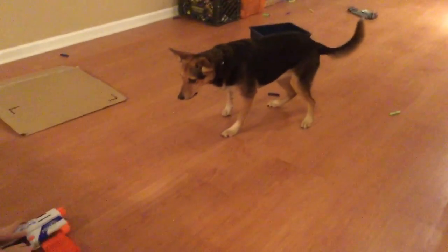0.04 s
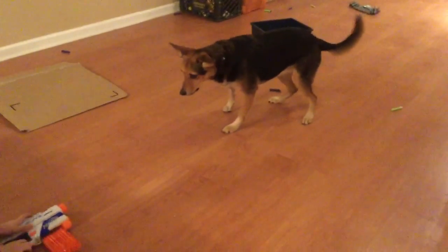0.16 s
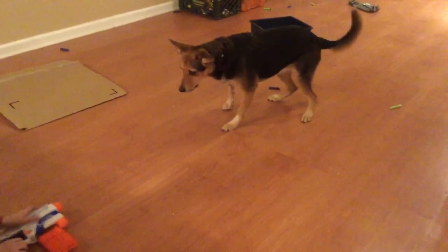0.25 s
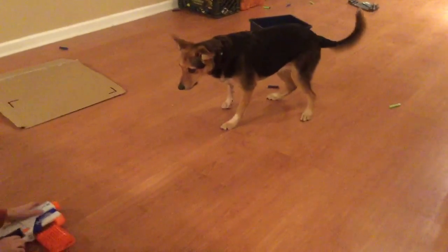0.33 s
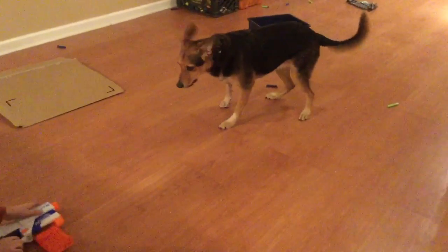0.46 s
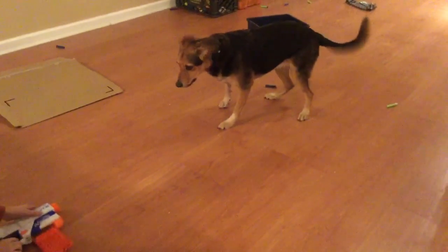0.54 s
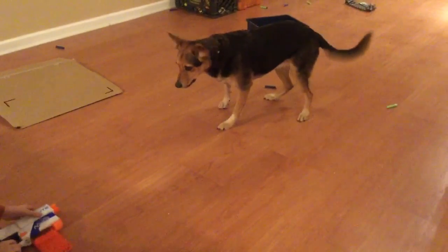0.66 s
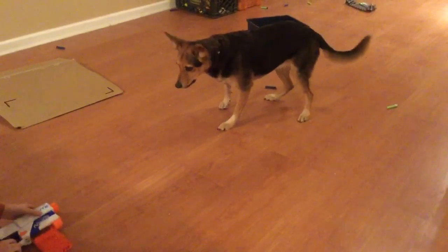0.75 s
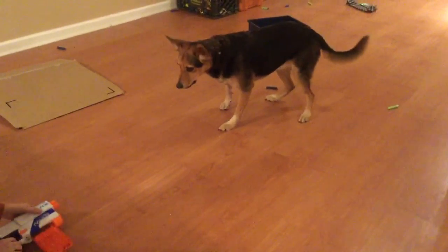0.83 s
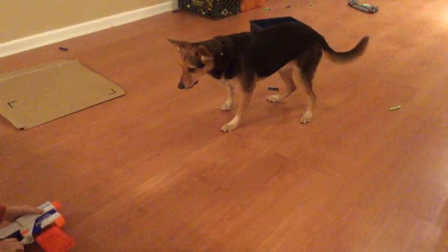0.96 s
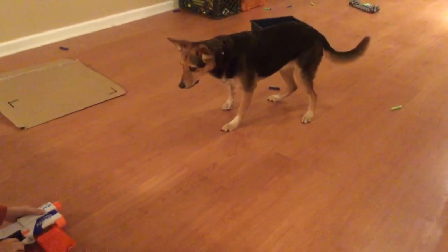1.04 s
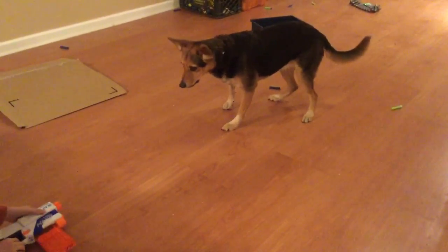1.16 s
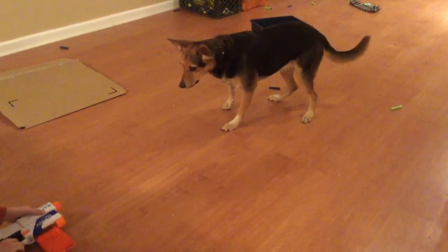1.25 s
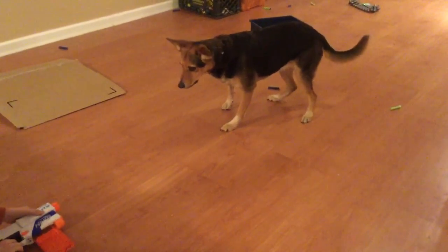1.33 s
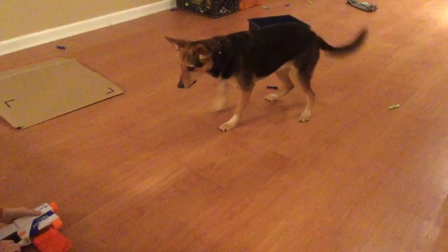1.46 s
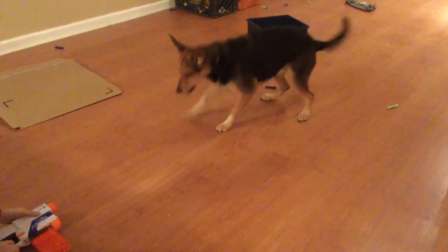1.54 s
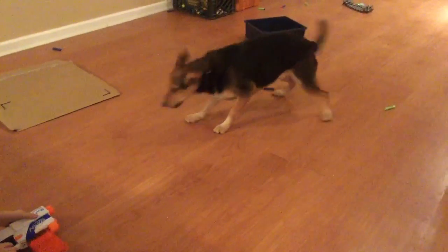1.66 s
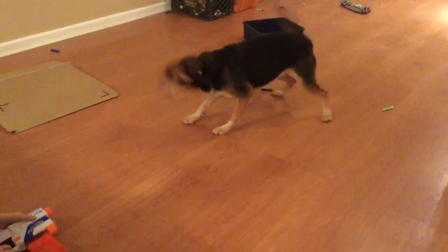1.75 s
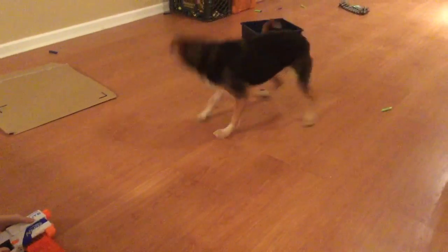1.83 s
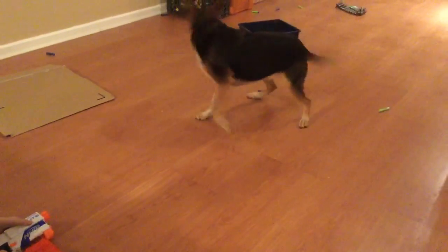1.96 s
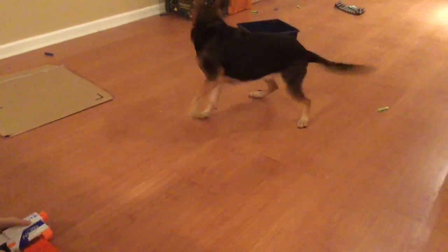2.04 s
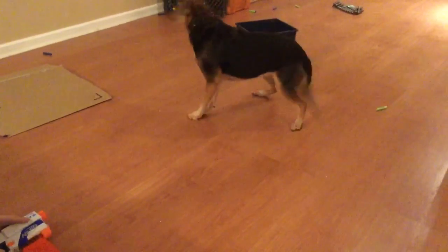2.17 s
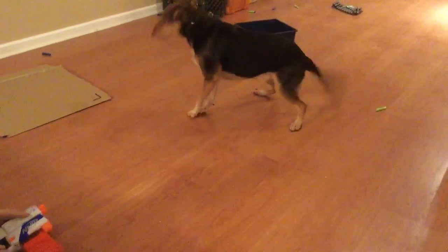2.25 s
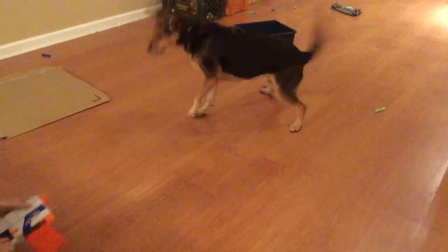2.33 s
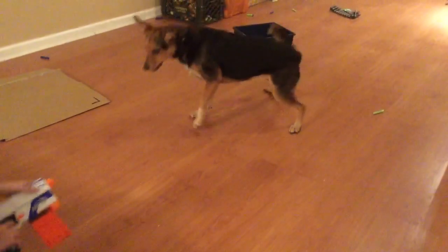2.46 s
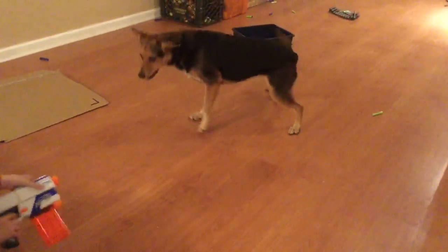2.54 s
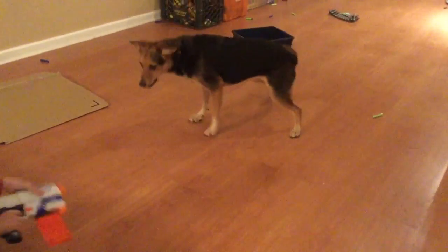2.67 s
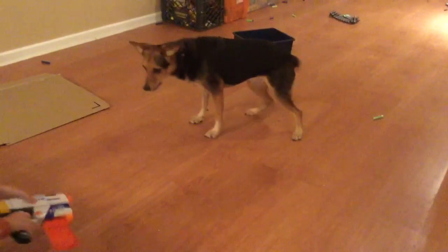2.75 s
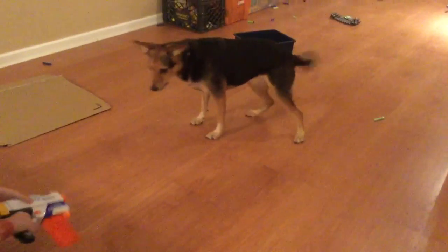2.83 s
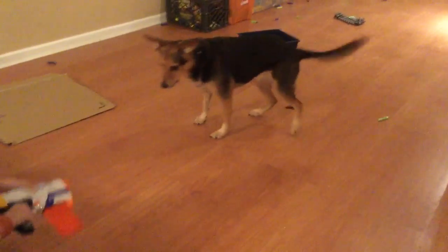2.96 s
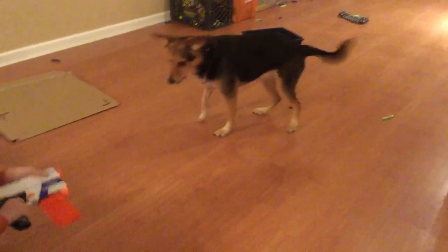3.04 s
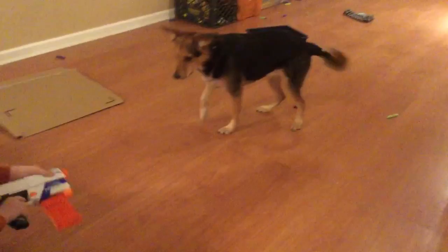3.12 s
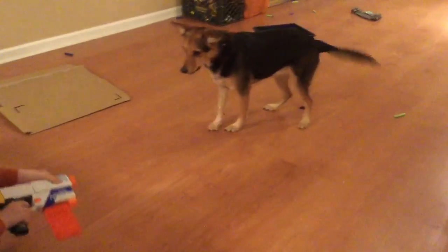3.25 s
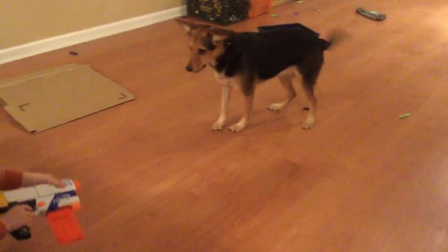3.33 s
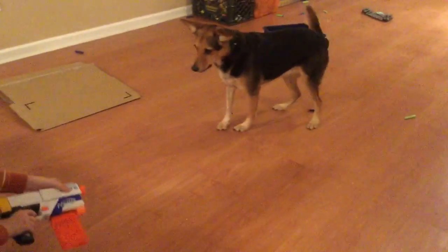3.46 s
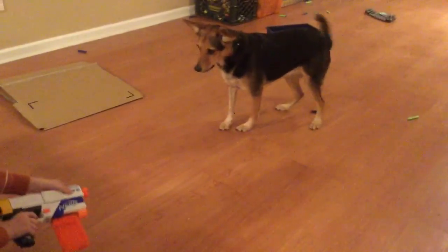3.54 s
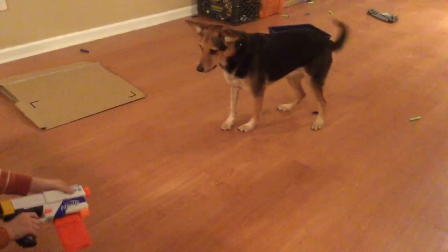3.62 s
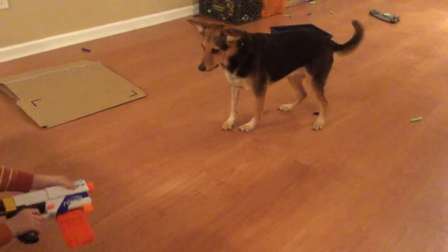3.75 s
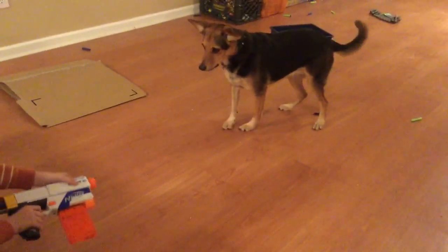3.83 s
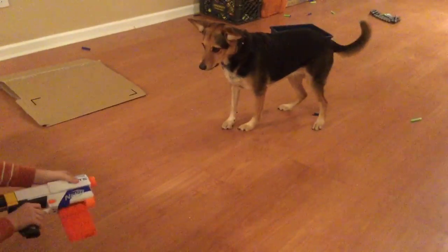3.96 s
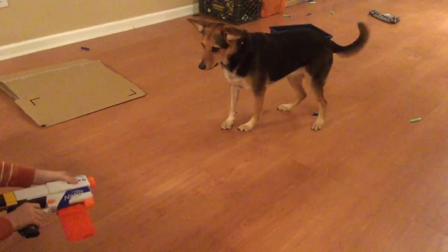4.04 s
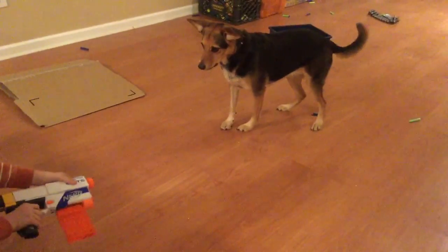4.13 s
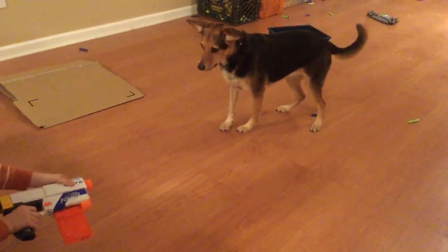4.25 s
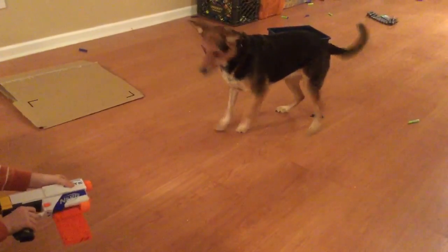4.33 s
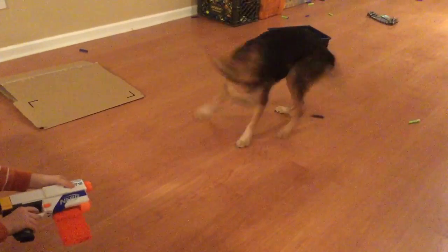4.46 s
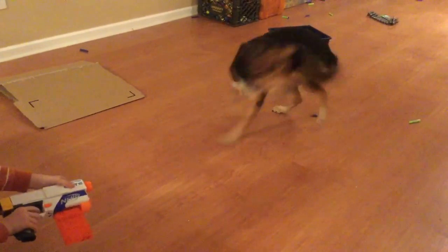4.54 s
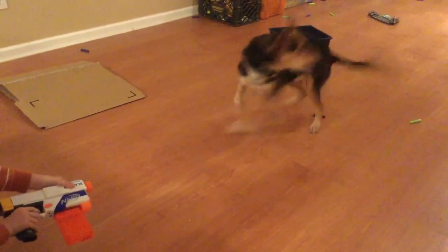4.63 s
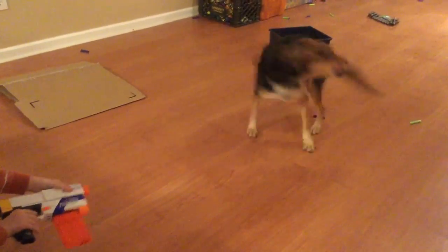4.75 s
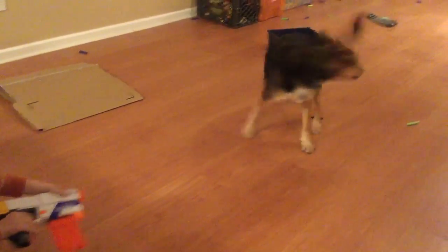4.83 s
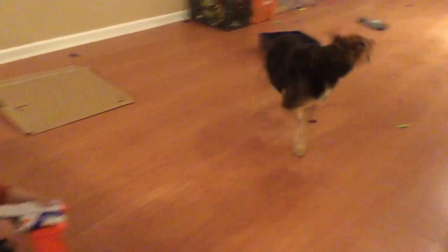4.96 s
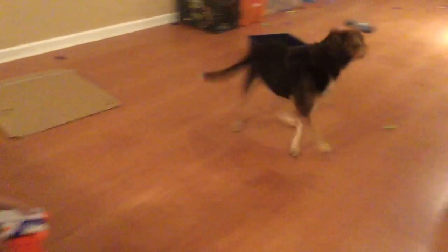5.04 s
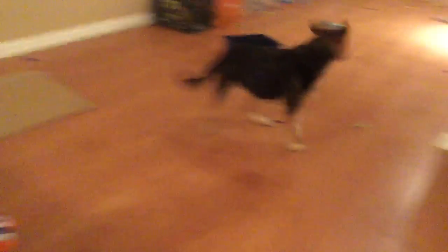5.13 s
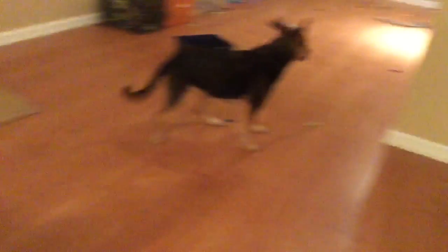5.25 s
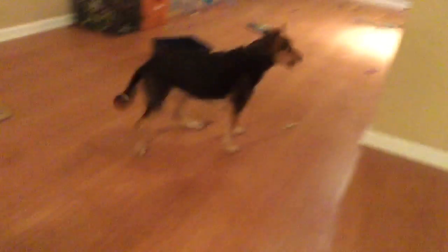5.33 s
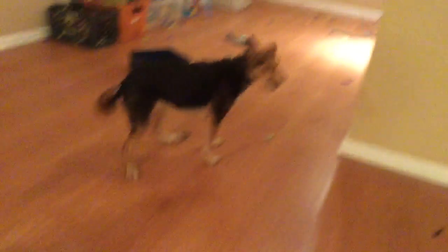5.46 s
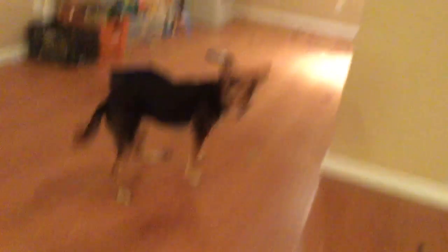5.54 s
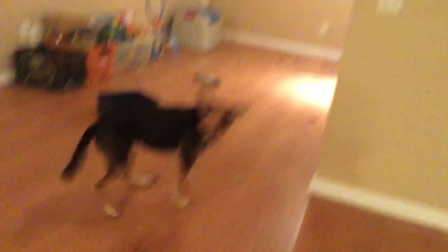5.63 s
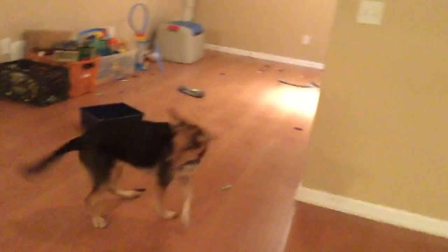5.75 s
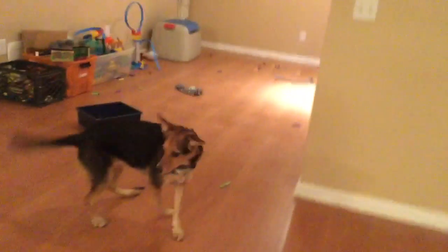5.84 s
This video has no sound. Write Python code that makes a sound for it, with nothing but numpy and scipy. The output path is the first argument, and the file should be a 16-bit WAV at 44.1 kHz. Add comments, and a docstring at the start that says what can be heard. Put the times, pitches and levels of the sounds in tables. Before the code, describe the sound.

In a quiet room with a hard floor, a plastic toy dart blaster is cocked close to the microphone, clicking and rasping through the first half second. At about 1.5 seconds it fires with a sharp, hollow snap. A few steps away a dog's claws click and skid, and it gives two loud, short barks at about 1.9 and 2.3 seconds, which ring briefly in the room. From 2.8 to 3.2 seconds the plastic slide rubs and clacks again. The second shot comes at 4.3 seconds, followed by scrabbling claws and two more barks at 4.8 and 5.1 seconds. The last bark trails off into a softer, grumbling whine that lasts until about 5.7 seconds, as the blaster begins to click and slide once more. A faint low rumble of movement and a slight room hiss lie underneath.

```python
"""Dart blaster and barking dog

A toy dart blaster is cocked and fired twice in a living room with a hard floor: plastic catches click,
a slide rubs, a plunger slams home. After each shot a young dog jumps, claws skidding, and barks twice,
each bark one push of breath; the last trails off in a grumbling whine. The room rings over a low
rumble, the camera takes two soft bumps, and its limiter squeezes the loudest peaks."""
import sys
import numpy as np
from scipy import signal
from scipy.fft import rfft, irfft, dct, next_fast_len
from scipy.io import wavfile
from scipy.ndimage import uniform_filter1d, minimum_filter1d, map_coordinates

SR = 44100
rng = np.random.default_rng(int(sys.argv[2]) if len(sys.argv) > 2 else 0)


def generate_wav(signal):
    """Clip the signal to [-1, 1] and save it as 16-bit WAV at the path in sys.argv[1]."""
    frames = np.transpose(np.atleast_2d(signal))
    scaled = np.clip(frames, -1, 1) * 32767
    pcm = np.round(scaled).astype(np.int16)
    wavfile.write(sys.argv[1], SR, pcm)


N = 259749
TIME = np.arange(N) / SR

# In the tables, t is when a sound happens, tilt adds treble, and t60 is the time to fade by 60 dB.
# how long the room echoes: f/Hz, t60/s
ROOM_FADE = [(100, 0.15), (300, 0.6), (700, 0.4), (1050, 0.55), (1370, 0.51), (1800, 0.47), (4800, 0.46),
             (9000, 0.34), (14000, 0.29)]
# the hiss of the quiet room: f/Hz, level/dB
HUSH_COLOUR = [(100, 7), (350, 0), (600, -6), (2400, -6), (3500, -13.5), (8000, -22), (15000, -31)]
# hands shift or the dog moves: t/s, length/s, level/dB, swell/dB
MOVEMENTS = [(0, 0.25, -59, -13), (.3, 0.8, -67, -2), (1.63, 0.31, -46.5, -1), (3.25, .25, -72.5, -2),
             (3.98, 0.11, -71.5, -8.5), (4.25, 1, -54.5, -2), (5.25, 0.73, -72.5, -14)]
# the low tone of those movements: f/Hz, level/dB
MOVEMENT_COLOUR = [(25, -20.5), (60, -10.5), (110, 3.5), (250, -7.5), (500, -16.5), (1500, -20),
                   (5000, -37.5)]
# plastic catches: t/s, level/dB, wait for the knock/s, tilt/(dB per octave), shell pitch/ratio
CATCHES = [(0.125, -41.5, 0.0061, 2.5, 1), (0.146, -32, 0.018, 0, 1), (0.277, -37, 0.01, -2.5, 1),
           (.320, -30.5, .007, -3.5, 1), (.367, -26, .012, -0.5, 0.86), (0.3988, -21, .0085, -1.5, 0.78),
           (.684, -41.5, 0.02, -3, 0.89), (1.035, -52.5, 0.0037, -4.5, 0.86), (2.758, -35, 0.01, 0, 1),
           (2.808, -29.5, .015, 2, 0.37), (2.849, -26.5, .014, 3, .85), (3.045, -33, 0.011, -0.5, 1),
           (3.133, -20, .013, 3, 1), (3.149, -20, .004, -2, 1), (3.3162, -42, 0.0018, 2.5, 0.92),
           (3.576, -62.5, 0.0037, -1, 1), (5.616, -37, 0.0092, 3.5, 0.91), (5.707, -25.5, 0.015, 2, 0.65)]
# the blaster's hollow shell: f/Hz, level/dB
SHELL_COLOUR = [(60, -25), (150, -9.5), (400, -2.5), (750, 7.5), (1100, -1.5), (1600, 5), (2500, 2),
                (4500, -2.5), (9000, -6.5), (13000, -6), (16000, -10)]
# the cocking slide moves: t/s, length/s, level/dB, swell/dB, shell pitch/ratio
SLIDE_MOVES = [(0.337, .085, -33, 19, 0.8), (2.77, 0.11, -30.5, -1, 0.83), (3.017, 0.0076, -48, -7, 1.2),
               (3.05, 0.1214, -34, 8, 0.8), (5.674, 0.092, -30, 0, 1.04), (5.773, .11, -39, -13.5, 0.63)]
# the plunger lands: t/s, level/dB, decay/s, tilt/(dB per octave), wait for the rebound/s
PLUNGER_HITS = [(1.4583, -9, 0.0035, -2.5, .0073), (4.3117, -16, 0.012, -1.1, .010)]
# the blaster struck by its plunger: f/Hz, level/dB
PLUNGER_COLOUR = [(40, -25.5), (105, -1), (160, -4), (200, -2), (300, -7), (550, -4), (850, -4),
                  (1450, -2.5), (2100, -7.5), (3200, -13.5), (6000, -16), (10000, -16.5), (14000, -14.5)]
# claws strike the floor: t/s, level/dB, tilt/(dB per octave)
CLAW_TAPS = [(1.6595, -22.5, 7.5), (1.734, -26.5, -4), (4.519, -22.5, 0.5), (4.5265, -20.5, -2.5),
             (4.671, -20, 0.5), (4.786, -17, 0.5), (5.304, -36, -1)]
# paws skid: t/s, length/s, level/dB, swell/dB
PAW_SKIDS = [(1.662, 0.041, -37, -2), (1.735, 0.062, -41, -10), (2.45, .23, -57, 8.5),
             (2.69, .06, -54.5, -12), (4.47, 0.068, -35.5, 9.5), (4.56, 0.079, -41, -7),
             (4.67, 0.068, -37.5, -4), (5.22, 0.35, -49.5, 5)]
# a paw on the hard floor: f/Hz, level/dB
PAW_COLOUR = [(60, -16.5), (160, -4.5), (400, -3.5), (750, 4.5), (1100, -6), (2200, 0.5), (3700, 4),
              (5500, 2), (8000, -4.5), (15000, -13.5)]
# barks: t of the top/s, rise/s, fall/s, flatness of the top, top f/Hz, level/dB,
# extra level on the way up/dB, top roughness/(0-1), brightness/(dB per octave), extra whistle/dB
BARK_PUSHES = [(1.948, .099, 0.061, 2.8, 722.2, -10.5, 5.5, .42, 6.5, -1.5),
               (2.251, .078, .064, 3.4, 687, -9.5, 1, .25, 8, 2.5),
               (4.797, .070, .078, 2.5, 703, -9, 3, 0.34, 1, 0),
               (5.078, .083, 0.054, 3.1, 681.3, -9.5, -2, 0.17, 6.5, -12)]
# the throat with the mouth open: f/Hz, level/dB
MOUTH_OPEN = [(150, -26), (340, -14.5), (480, 10.5), (570, 7), (700, 1.5), (780, -6.5), (980, 5),
              (1150, -8), (1380, -1), (1550, -7), (1900, -10), (2250, -36.5), (2700, -30), (3050, -36.5),
              (3400, -31.5), (4600, -46.5), (6000, -36), (8000, -56)]
# the throat with the mouth closed: f/Hz, level/dB
MOUTH_CLOSED = [(130, -5), (240, 16.5), (430, 2), (700, -17.5), (1400, -12.5), (2000, -36), (4000, -42.5)]
# air rasping at the teeth: f/Hz, level/dB
TEETH_COLOUR = [(1500, -23.5), (2300, -16.5), (2700, 3), (3000, 0), (3400, -2.5), (4400, 0.5), (6000, -6.5),
                (7600, -3.5), (12000, -6), (15000, -13)]
# things in the room that ring along with a bark: f/Hz, t60/s, level/dB
RINGING_THINGS = [(450, .8, -18), (678, 0.32, -21), (1262, 1.1, -14.5), (1318, 1.05, -13.5),
                  (1358, 1.0, -16.5), (1395, .9, -17), (1550, 0.69, -12.5), (1890, .8, -12),
                  (3400, 0.6, -9)]
# yips, grumbles and whines, mouth mostly closed: t/s, length/s, first f/Hz, last f/Hz, arch/Hz, level/dB
WHINE_GLIDES = [(2.01, 0.016, 594, 568.5, 2.5, -13.5), (4.879, 0.063, 265, 224, 4.5, -32),
                (4.948, 0.061, 208.5, 235, -13, -24), (5.160, 0.11, 205, 141.2, 1.5, -31),
                (5.253, .055, 328.2, 288, 105.5, -22.5), (5.319, 0.11, 339.4, 248.3, -1.5, -35),
                (5.446, 0.087, 283, 309, 46, -43.5), (5.577, 0.061, 354, 305, 11, -34.5),
                (5.628, 0.056, 298, 253.4, -2, -37.5)]
# soft bumps against the camera: t/s, level/dB, decay/s, tilt/(dB per octave)
SOFT_BUMPS = [(3.435, -53.5, 0.037, -4), (3.49, -57.5, 0.026, -4)]
# the deep thud of a bump: f/Hz, level/dB
THUD_COLOUR = [(20, -3), (35, -4), (55, 1), (90, -14), (300, -51), (2000, -65)]


def from_db(db):
    """Turns decibels into a gain to multiply by."""
    return 10 ** (np.asarray(db) / 20)


def rms_one(x):
    """Scales a sound to an average (rms) level of 1."""
    return x / np.sqrt(np.mean(x ** 2) + 1e-20)


def even(x):
    """Holds the level near 1 from cycle to cycle."""
    return x / np.sqrt(np.abs(uniform_filter1d(x * x, size=500)) + 1e-12)


def at_hz(points, hz):
    """Reads between the rows of a table, on a scale of octaves."""
    f, value = np.transpose(points)
    return np.interp(np.log(np.maximum(hz, 1)), np.log(f), value)


def colour(x, spectrum, tilt_db=0):
    """Filters a sound by a table of levels, tilted by tilt_db per octave."""
    size = 2 * next_fast_len(len(x))
    hz = np.arange(size // 2 + 1) * SR / size
    octaves = np.log2(np.maximum(hz, 300) / 1000)
    cepstrum = irfft(np.log(from_db(at_hz(spectrum, hz) + tilt_db * octaves)))
    cepstrum[1:size // 2] *= 2   # folded so the filter rings only after a hit, never before
    cepstrum[size // 2 + 1:] = 0
    return irfft(rfft(x, size) * np.exp(rfft(cepstrum)))[:len(x)]


def drift(rate_hz, size):
    """A smooth random wander, about 1 in size."""
    steps = np.arange(0, size + 12, 12)
    wander = map_coordinates(rng.standard_normal(4096), [steps * rate_hz / SR], mode="wrap")
    return rms_one(np.interp(np.arange(size), steps, wander))


def reflections(build_s, count=96, size=256):
    """The room's answer to a click: echoes build up, then each frequency dies at its own rate."""
    t = TIME[:count * size]
    hz = (np.arange(size) + .5) * SR / (2 * size)
    decay = np.exp(-np.log(1000) * t[::size, None] / at_hz(ROOM_FADE, hz))
    tail = dct(rng.standard_normal((count, size)) * decay, type=4, norm="ortho").ravel()
    return rms_one(tail * (1 - np.exp(-t / build_s))) / np.sqrt(len(t))


def room(x, wet_db, build_s):
    """A sound plus its echoes, whose level is wet_db."""
    return x + from_db(wet_db) * signal.fftconvolve(x, reflections(build_s))[:N]


def strokes(table, attack_db_per_s, release_db_per_s):
    """The gain of some movements: each sets in, swells or sinks evenly, and dies away."""
    out = 0
    for s, length, level_db, swell_db in table:
        along = np.clip((TIME - s) / length, 0, 1)
        before_db = attack_db_per_s * np.maximum(s - TIME, 0)
        after_db = release_db_per_s * np.maximum(TIME - s - length, 0)
        out = out + from_db(level_db + swell_db * (along - .5) - np.minimum(before_db + after_db, 200))
    return out


def blows(table, spectrum, wet_db, build_s, ripple_db=5.5):
    """Each blow is a quick burst of noise with echoes, coloured by the thing it strikes."""
    out = np.zeros(N + SR)
    hz = np.geomspace(20, 16000, 90)
    for s, level_db, decay_s, tilt_db in table:
        echoes = reflections(build_s)
        fall = np.exp(-TIME[:len(echoes)] / decay_s)
        crack = rng.standard_normal(len(fall)) * fall + from_db(wet_db) * np.linalg.norm(fall) * echoes
        # each spot that is struck rings a little differently
        spot_db = ripple_db * rng.standard_normal(len(hz)) * (hz > 500)
        body = np.transpose([hz, at_hz(spectrum, hz) + spot_db])
        gain = from_db(level_db) * np.sqrt(3 * np.mean(fall ** 2))
        start = round(s * SR)
        out[start:start + len(fall)] += gain * rms_one(colour(crack, body, tilt_db))
    return out[:N]


def rubbing(gain, spectrum, slips_per_s, spread_db, tilt_db):
    """Rubbing is a dense run of tiny slips of uneven size."""
    slips = (rng.random(N) < slips_per_s / SR) * rng.standard_normal(N)
    moving = gain > from_db(-100)
    uneven = slips[moving] * from_db(spread_db * drift(250, moving.sum()))
    out = np.zeros(N)
    out[moving] = gain[moving] * rms_one(colour(uneven, spectrum, tilt_db))
    return out


def hush(level_db=-73):
    """The quiet room: faint, steady noise."""
    return from_db(level_db) * rms_one(colour(rng.standard_normal(N), HUSH_COLOUR))


def rumble(still_db=-88):
    """Low noise swells while hands shift or the dog moves."""
    gain = from_db(still_db) + strokes(MOVEMENTS, attack_db_per_s=203, release_db_per_s=109)
    return gain * rms_one(colour(rng.standard_normal(N), MOVEMENT_COLOUR))


def shell(ratio):
    """The hollow blaster rings lower or higher with the grip and the place of the slide."""
    return [(hz * ratio if hz < 2000 else hz, db) for hz, db in SHELL_COLOUR]


def catch(s, level_db, gap_s, tilt_db, ratio, tick_decay_s=.003, knock_decay_s=.0078):
    """A catch ticks brightly over its edge, then lands with a longer, duller knock."""
    tick = (s, level_db + 3, tick_decay_s, tilt_db + 1.5)
    knock = (s + gap_s, level_db - 1.95, knock_decay_s, tilt_db - 1.5)
    return blows([tick, knock], shell(ratio), wet_db=-5, build_s=.00081)


def slide_stroke(s, length, level_db, swell_db, ratio):
    """The plastic slide rubs along its rails and sounds through the shell."""
    gain = strokes([(s, length, level_db, swell_db)], attack_db_per_s=327.5, release_db_per_s=1496.5)
    return rubbing(gain, shell(ratio), slips_per_s=3000, spread_db=3, tilt_db=.6)


def shots(trigger_lead_s=.0025, trigger_db=-21, rebound_db=1):
    """The trigger lets go, then the plunger slams home and bounces once."""
    hits = []
    for s, level_db, decay_s, tilt_db, rebound_s in PLUNGER_HITS:
        for delay_s, extra_db in [(-trigger_lead_s, trigger_db), (0, 0), (rebound_s, rebound_db)]:
            hits.append((s + delay_s, level_db + extra_db, decay_s, tilt_db))
    return blows(hits, PLUNGER_COLOUR, wet_db=-4, build_s=.0014, ripple_db=2.5)


def claws(decay_s=.0031):
    """Claws click on the hard floor."""
    taps = [(s, level_db, decay_s, tilt_db) for s, level_db, tilt_db in CLAW_TAPS]
    return blows(taps, PAW_COLOUR, wet_db=-2, build_s=.0048)


def skids():
    """Paws scrape across the floor."""
    gain = strokes(PAW_SKIDS, attack_db_per_s=699, release_db_per_s=300.5)
    scrape = rubbing(gain, PAW_COLOUR, slips_per_s=8200, spread_db=.5, tilt_db=-1.4)
    return room(scrape, wet_db=-8, build_s=.0052)


def voice(curves, jitter, shimmer, half_db, rasp_db, air_db, shut_hz, open_hz):
    """Vocal folds buzz. When rough, pitch wobbles (jitter), level flutters (shimmer) and air leaks."""
    times, *controls = curves
    span = np.flatnonzero((TIME > times[0]) & (TIME < times[-1]))
    size = len(span)
    pitch, level_db, rough, bright_db = [np.interp(TIME[span], times, c) for c in controls]
    rough = np.clip(rough, 0, 1)
    opening = np.clip((pitch - shut_hz) / (open_hz - shut_hz), 0, 1)   # the jaw opens as pitch climbs
    phase = 2 * np.pi * np.cumsum(pitch * (1 + jitter * rough * drift(220.1, size))) / SR
    tone = np.zeros(size)
    for k in np.arange(1, 21) / 2:
        hz = k * pitch
        mouth_db = opening * at_hz(MOUTH_OPEN, hz) + (1 - opening) * at_hz(MOUTH_CLOSED, hz)
        gain = from_db(mouth_db + bright_db * np.log2(min(k, 2)) + 4.06 * rough * drift(46.23, size))
        if k % 1:   # strong and weak cycles take turns, adding tones between the harmonics
            gain = gain * rough * opening * from_db(half_db)
        shaky_phase = phase + .026 * rough * drift(400, size)
        tone += gain * np.cos(k * shaky_phase + rough * drift(50.54, size))
    puffs = rng.standard_normal(N)[span] * (1 + .52 * np.cos(phase))
    open_rasp = rms_one(colour(puffs, MOUTH_OPEN, tilt_db=4))
    closed_rasp = rms_one(colour(puffs, MOUTH_CLOSED)) / 2
    rasp = opening * open_rasp + (1 - opening) * closed_rasp
    throat = even(even(tone) + from_db(rasp_db) * rough * rasp)
    air_gain = from_db(air_db) * opening * pitch / open_hz * np.sqrt(rough)
    air = air_gain * rms_one(colour(puffs, TEETH_COLOUR))
    flutter = 1 + shimmer * rough * drift(150, size)
    out = np.zeros(N)
    out[span] = (throat + air) * flutter * from_db(level_db) * signal.windows.tukey(size, .04)
    return out


def bark_curves(top_s, rise_s, fall_s, flatness, top_hz, top_db, early_db, top_rough, bright_db,
                rest_hz=187.05, slack_db=21.5, release_db=5, fade_db_per_s=699):
    """One push of breath swells and sinks; pitch, level and brightness follow the effort."""
    t = np.linspace(-.2, .2, 401)   # seconds from the top
    along = t / np.where(t < 0, rise_s, fall_s)
    effort = np.exp(-np.abs(along) ** flatness)
    early = np.clip(-along, 0, 1)
    released = np.clip(2 * along, 0, 1) ** 2   # past the top, the pressure is let go
    unvoiced_s = np.maximum(-t - 1.108 * rise_s, 0) + np.maximum(t - 1.44 * fall_s, 0)
    pitch = rest_hz + (top_hz - rest_hz) * effort
    push_db = top_db + early_db * early - release_db * released - slack_db * (1 - effort) ** 2
    level_db = push_db - fade_db_per_s * unvoiced_s
    rough = top_rough + np.interp(effort, [0, .44, 1], [0, .45, 0])   # roughest at middling effort
    dull_db = 9 * np.minimum(1 - effort, .5) + .5 * released
    return top_s + t, pitch, level_db, rough, bright_db - dull_db


def whistle(curves, middle_hz=6170, climb_hz_per_s=11000, width_hz=650, gain_db=-31.5):
    """Air whistles at the teeth: a narrow hiss that climbs through a bark."""
    times, _, level_db, _, _ = curves
    span = np.flatnonzero((TIME > times[0]) & (TIME < times[-1]))
    t = TIME[span]
    phase = 2 * np.pi * np.cumsum(middle_hz + climb_hz_per_s * (t - t.mean())) / SR
    gain = from_db(np.interp(t, times, level_db) + gain_db)
    out = np.zeros(N)
    out[span] = gain * np.cos(phase + 2 * drift(width_hz, len(t)))
    return out


def bark(*push, whistle_db):
    """One push of breath drives both the voice and the whistle."""
    curves = bark_curves(*push)
    call = voice(curves, jitter=.055, shimmer=.36, half_db=-5.5, rasp_db=-.5, air_db=-30.5,
                 shut_hz=197, open_hz=418)
    return call + from_db(whistle_db) * whistle(curves)


def ringing_things(x):
    """Things in the room pick up a bark and ring on after it, each at its own pitch."""
    out = 0
    for hz, t60, level_db in RINGING_THINGS:
        r = np.exp(-np.log(1000) / (t60 * SR))   # share of the ring left after one sample
        ring = signal.lfilter([1, 0, -1], [1, -2 * r * np.cos(2 * np.pi * hz / SR), r * r], x)
        out = out + 2 * from_db(level_db) * (1 - r * r) * ring
    return out


def whine(s, length, first_hz, last_hz, arch_hz, level_db, rough=.34, bright_db=3):
    """A soft swell of voice whose pitch glides along an arch."""
    along = np.linspace(.01, .99, 50)
    arch = np.sin(np.pi * along)
    pitch = first_hz + (last_hz - first_hz) * along + arch_hz * arch
    swell_db = level_db + 10 * np.log10(arch)
    curves = np.broadcast_arrays(s + length * along, pitch, swell_db, rough, bright_db)
    return voice(curves, jitter=.11, shimmer=.62, half_db=-5, rasp_db=1, air_db=-30,
                 shut_hz=450, open_hz=800)


def dog():
    """Barks and whines in the room; the dog moves, so each bark gets its own echoes."""
    barks = [bark(*push, whistle_db=extra_db) for *push, extra_db in BARK_PUSHES]
    whines = sum(whine(*row) for row in WHINE_GLIDES)
    barking = sum(room(one, wet_db=-5.5, build_s=.002) for one in barks)
    return barking + ringing_things(sum(barks)) + room(whines, wet_db=-9.5, build_s=.0037)


def bumps():
    """Soft bumps against the camera make deep thuds."""
    return blows(SOFT_BUMPS, THUD_COLOUR, wet_db=-18, build_s=.012, ripple_db=0)


def limiter(x, ceiling_db, release_db_per_s):
    """Turns the sound down just ahead of a peak, then back up at a steady rate."""
    over_db = np.maximum(20 * np.log10(np.abs(x) + 1e-9) - ceiling_db, 0)
    recovery_db = release_db_per_s * TIME
    cut_db = np.maximum.accumulate(over_db + recovery_db, axis=-1) - recovery_db
    return x * from_db(uniform_filter1d(minimum_filter1d(-cut_db, size=90), size=90))


def scene():
    """The blaster is close by, the dog a few steps away; all in one channel."""
    blaster = shots() + sum(catch(*row) for row in CATCHES)
    slide = room(sum(slide_stroke(*row) for row in SLIDE_MOVES), wet_db=-6.5, build_s=.00067)
    return (blaster + slide + claws() + skids() + rumble() + hush() + bumps() + dog())[None]


def record(dry):
    """Loud peaks are held down and rounded, a bit lopsidedly; the deepest bass and top treble are cut."""
    held = limiter(dry, ceiling_db=1.5, release_db_per_s=150)
    rounded = held / (1 + held ** 8) ** (1 / 8)
    lopsided = rounded - .018 * rounded ** 4
    bass_cut = signal.butter(1, 20, "high", fs=SR, output="sos")
    treble_cut = signal.ellip(10, .2, 80, 15300, fs=SR, output="sos")
    return signal.sosfilt(treble_cut, signal.sosfilt(bass_cut, lopsided))


dry = scene()
out = record(dry)
generate_wav(out)
```